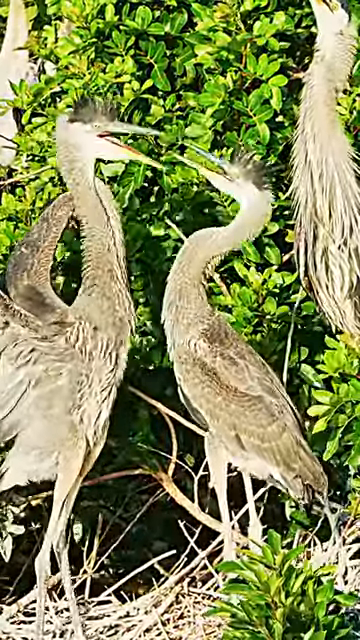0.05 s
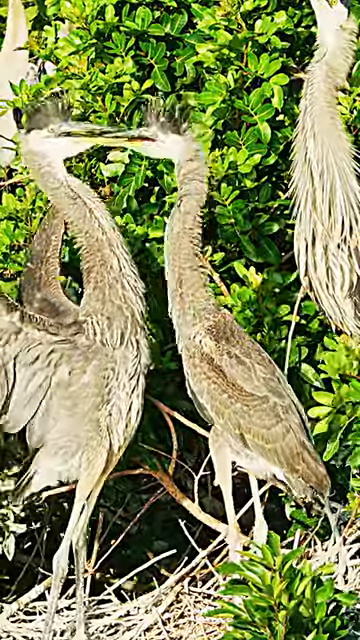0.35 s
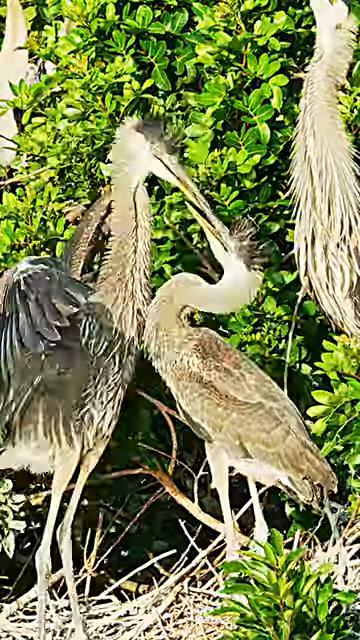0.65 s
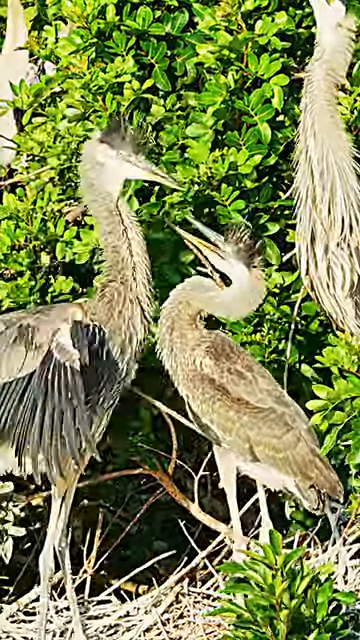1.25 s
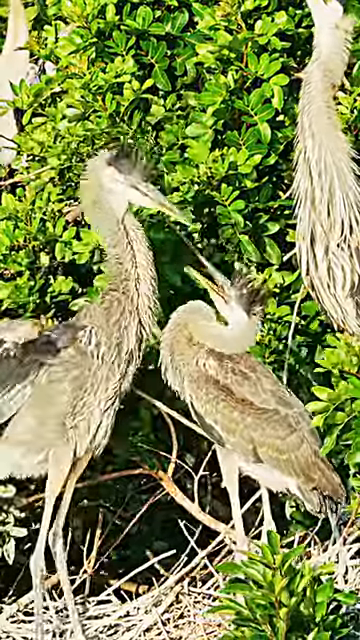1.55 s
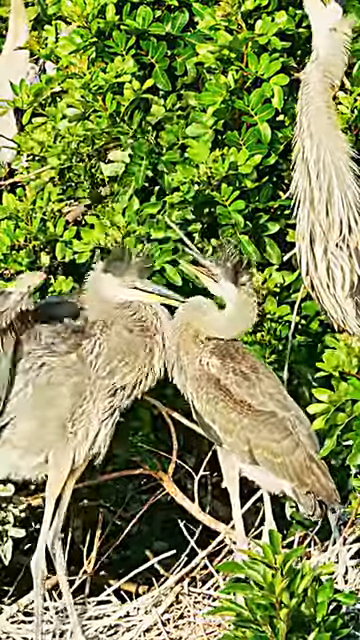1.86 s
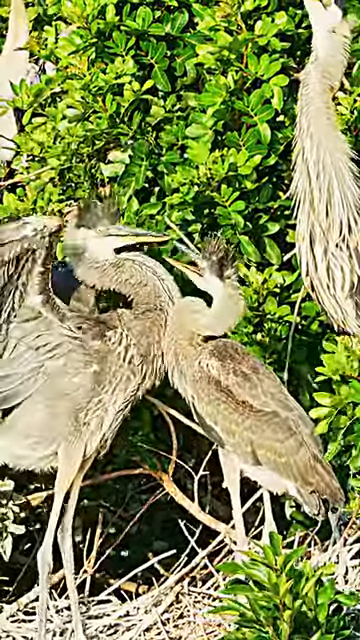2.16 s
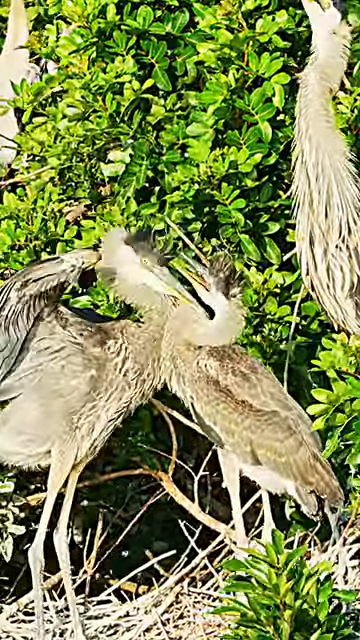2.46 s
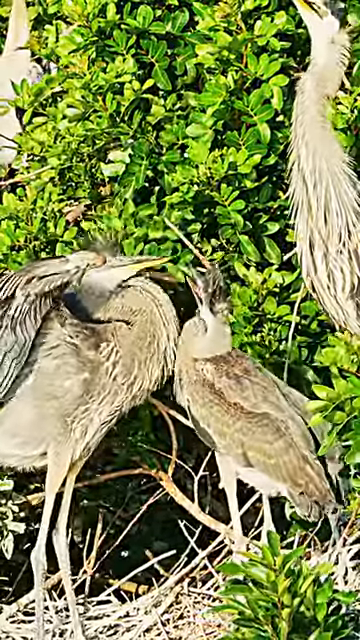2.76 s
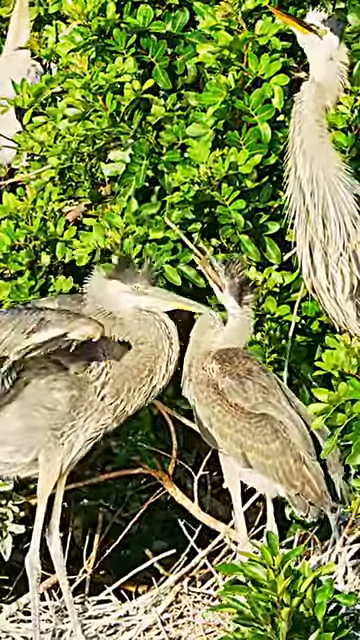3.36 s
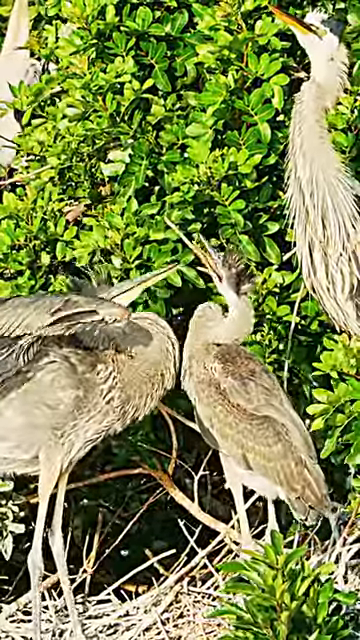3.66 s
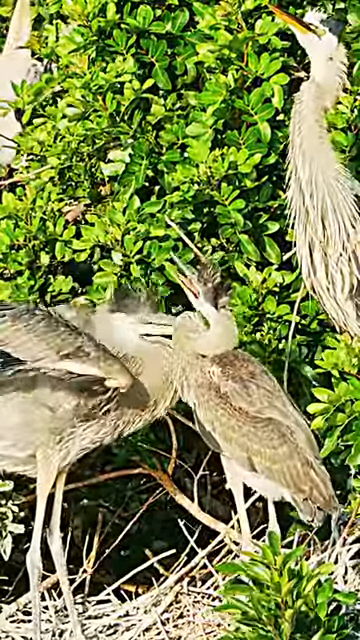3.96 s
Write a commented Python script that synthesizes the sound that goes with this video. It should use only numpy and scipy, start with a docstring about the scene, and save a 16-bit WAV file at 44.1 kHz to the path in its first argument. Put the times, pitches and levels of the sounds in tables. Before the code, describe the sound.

Hollow knocks and thin, sharp snaps come in clusters as two young herons clash bills outdoors. Faint nestling squeaks and rustling leaves fill the gaps, while distant traffic and light wind rumble underneath, easing near the end.

```python
"""Two young herons spar on a stick nest, over a steady bed of distant engines and light wind.
Wings and feet stir leaves and twigs. At 0.2 s the bills start to knock, snap shut and scrape along
each other, the bushes scattering every click; at 0.5 s a rising rattle runs into a hard knock.
More flurries follow near 2 s and 3 s, with faint nestling squeaks and hoarse rasps here and there.
After a loud knock and scrape at 3.2 s the deepest rumble sinks away under a few last taps."""
import sys
import numpy as np
from scipy import signal
from scipy.fft import rfft, irfft
from scipy.io import wavfile
from scipy.ndimage import uniform_filter1d

SR = 44100
rng = np.random.default_rng(int(sys.argv[2]) if len(sys.argv) > 2 else 0)


def put_to_file(sound):
    """Save the sound as 16-bit audio at rate SR, in the file named by the first command-line argument."""
    columns = np.atleast_2d(sound).T  # one column per channel
    safe = np.clip(columns, -1, 1)
    whole_steps = np.round(safe * 32767)
    wavfile.write(sys.argv[1], SR, whole_steps.astype(np.int16))


N = 176400  # 4 s


def undb(db):
    """Decibels to gain."""
    return 10 ** (np.asarray(db) / 20)


def unit(x):
    """Scale to rms 1."""
    return x / np.sqrt(np.mean(x ** 2))


def noise():
    """White noise."""
    return rng.standard_normal(N)


def colour(x, curve):
    """EQ a sound with a curve of (f/Hz, level/dB) points; rms 1."""
    hz, db = np.array(curve).T
    f = np.maximum(np.arange(len(x) // 2 + 1) * SR / len(x), 1)
    gain = undb(np.interp(np.log(f), np.log(hz), db))
    return unit(irfft(rfft(x) * gain, len(x)))


def fader(t, points):
    """Gain that rides through (t/s, level/dB) points."""
    return undb(np.interp(t, *np.array(points).T))


def resonate(x, hz, width_hz):
    """Band-pass through one resonance."""
    hz = min(hz, .45 * SR)
    q = hz / min(width_hz, SR / np.pi)
    return signal.lfilter(*signal.iirpeak(hz, q, fs=SR), x)


def walk(per_s):
    """Smooth random wandering; rms 1."""
    hold = int(SR / per_s)
    steps = np.repeat(rng.standard_normal(N // hold + 1), hold)
    return unit(uniform_filter1d(steps, hold)[:N])


def grains(per_s, spread_db):
    """Crackle of tiny impulses of uneven size; rms 1."""
    size = undb(spread_db * np.minimum(rng.exponential(size=N), 4))
    return unit((rng.random(N) < per_s / SR) * size * np.sign(noise()))


def add(out, s, sound):
    """Mix a sound in at s seconds."""
    i = int(np.clip(s * SR, 0, N - 1))
    out[i:i + len(sound)] += sound[:N - i]


KNOCK_CYCLES, SNAP_CYCLES = 0.65, 0.8  # cycles for a ring's decay to reach 1 / e


def click(hz, decay_cycles, crack_db):
    """A hard contact: two heavily damped modes, a sharp crack and a quick rebound."""
    t = np.arange(512) / SR
    hz = min(hz, SR / 3)
    cycles, upper_ratio = hz * t, 1.537
    attack = (1 - np.exp(-cycles / 1.05)) ** 2
    upper = undb(-9.5) * np.sin(2 * np.pi * cycles * upper_ratio) * (hz * upper_ratio < SR / 2)
    ring = attack * np.exp(-cycles / decay_cycles) * (np.sin(2 * np.pi * cycles) + upper)
    low_cut = signal.butter(2, hz / np.sqrt(2), "high", fs=SR)  # a small body radiates little bass
    ring = signal.lfilter(*low_cut, ring)
    crack = rng.standard_normal(len(t)) * np.exp(-t / 0.00017)
    for _ in range(2):
        crack = resonate(crack, hz=7220, width_hz=8300)
    hit = ring / np.abs(ring).max() + undb(crack_db) * crack / np.abs(crack).max()
    lag = int(0.00071 * (1 + rng.random()) * SR)
    rebound = undb(-7.5) * np.pad(hit, (lag, 0))[:len(t)]
    return hit + rebound


# EQ of the rumble bed, centre and sides: f/Hz, relative level/dB
RUMBLE_MID_EQ = [(15, -42), (26, -7), (36, 1), (52, -7.5), (90, -9.5), (150, -17), (250, -24), (400, -30),
                 (570, -28.5), (800, -37), (1300, -43), (3000, -56.5), (8000, -67), (16000, -74)]
RUMBLE_SIDE_EQ = [(15, -14), (35, 4.5), (60, -6.5), (120, -14.5), (200, -8), (330, -15), (600, -23),
                  (1200, -32), (2400, -43.5), (4500, -69.5)]
# Engine drone bands: f/Hz, width/Hz, level/dB before the sub ride
ENGINE_BANDS = [(36, 4.03, -21.5), (132.5, 10.2, -33), (200.5, 6.5, -40.5)]
# Fader ride on the sub-bass: t/s, level/dB
SUB_RIDE = [(0, -2), (.55, 4.5), (2.8, 3), (3.3, 0), (4, -10)]


def distant_rumble(t):
    """Far engines drone unevenly in a wide bed of traffic and wind; the sub-bass swells and sinks."""
    mid = undb(-19.5) * colour(noise(), RUMBLE_MID_EQ)
    side = undb(-23.5) * colour(noise(), RUMBLE_SIDE_EQ)
    for hz, width_hz, db in ENGINE_BANDS:
        band = resonate(noise(), hz, width_hz)
        mid += undb(db) * unit(resonate(band, hz, 2 * width_hz))
    sub = resonate(mid, hz=25, width_hz=27)
    mid += sub * (fader(t, SUB_RIDE) - 1)
    return np.array([mid + side, mid - side])


# Dark EQ of the echo from the bushes: f/Hz, relative level/dB
BUSH_EQ = [(500, 16.5), (2800, 2), (9000, -2), (16000, -10.5)]


def bush_echo(x, t, t60_s=0.065, predelay_s=0.003):
    """Branches and leaves scatter a short, dull echo; wet signal only."""
    scatter = colour(grains(per_s=5000, spread_db=-5.5), BUSH_EQ)
    tail = scatter * undb(-60 * t / t60_s) * (t > predelay_s)
    return signal.fftconvolve(x, tail / np.sqrt(np.sum(tail ** 2)))[:N]


# EQ of the leaf rustle: f/Hz, relative level/dB
LEAF_EQ = [(900, -1), (2000, 3.5), (3500, 3.5), (5500, -2.5), (10000, -9.5), (16000, -12)]
# Fader ride on the birds' movement in the nest: t/s, level/dB
STIR_RIDE = [(0, -6), (.2, 2), (.45, 6.5), (.73, -2), (.95, 1.5), (1.06, -6), (1.36, 7), (1.46, -7),
             (1.6, 1), (1.8, 1), (1.96, 5.5), (2.08, -1.5), (2.3, 5), (2.52, -4), (2.72, 1.5), (2.84, 2),
             (3.42, 4.5), (4, -0.5)]


def nest_rustle(t, twigs_per_s=35, twig_count=500):
    """Leaves and feathers rustle and small twigs tick as the birds move."""
    leaves = colour(grains(per_s=14000, spread_db=3.5), LEAF_EQ)
    leaves *= undb(-49.5 + 4.5 * walk(per_s=22.03))  # the level flickers
    twigs = np.zeros(N)
    for when, chance, size, pitch in rng.random((twig_count, 4)):
        hz = 7160 * 2 ** (0.8 * (2 * pitch - 1))  # within 0.8 octave either way
        tick = click(hz, SNAP_CYCLES, crack_db=-16)
        if chance < twigs_per_s * N / SR / twig_count:
            db = -31.5 + min(-np.log(size), np.e)
            add(twigs, when * N / SR, undb(db) * tick)
    return fader(t, STIR_RIDE) * (leaves + twigs)


def swell(t, peak_s, half_length_s):
    """Bell-shaped fade in and out."""
    return np.exp(-2 * ((t - peak_s) / half_length_s) ** 2)


# Faint nestling calls: peak t/s, half-length/s, level/dB, f/Hz, glide/(octaves per s)
SQUEAK_CUES = [(0.831, .012, -30, 3690, -20.5), (2.452, .022, -40, 2200, -4), (2.596, .014, -29, 4320, 1.5),
               (3.68, 0.021, -37.5, 2136, 14), (3.8, 0.013, -40, 2610, -1)]


def nestling_squeaks(t):
    """Short gliding whistles, made hoarse by an unsteady pitch."""
    out = np.zeros(N)
    waver = 1 + 0.06 * walk(per_s=700)
    for s, half_length, db, hz, glide in SQUEAK_CUES:
        octaves = glide * np.clip(t - s, -2 * half_length, 2 * half_length)
        pitch = hz * waver * 2 ** octaves
        out += undb(db) * swell(t, s, half_length) * np.sin(2 * np.pi * np.cumsum(pitch) / SR)
    return out


# Bright EQ of the grit: f/Hz, relative level/dB
GRIT_EQ = [(1000, -2), (2500, 7.5), (4500, 7), (8000, 5), (16000, -2.5)]
# Scrapes and rasps: peak t/s, half-length/s, level/dB before trim, body f/Hz, grit/dB re body
SCRAPE_AND_RASP_CUES = [(0.294, 0.043, -33, 2700, -20), (0.327, 0.016, -38, 3800, 11.5),
                        (0.348, 0.061, -32.5, 1660, -6.5), (0.47, 0.13, -38.5, 3860, -3),
                        (0.534, 0.025, -39, 1860, -7), (0.556, 0.014, -35, 2430, 7.5),
                        (0.575, 0.0049, -23.5, 4700, -3), (0.586, 0.1, -36.5, 3900, -22),
                        (0.783, 0.029, -32.5, 2170, -22), (0.838, 0.029, -27.5, 3520, -26),
                        (0.983, 0.015, -35, 2420, 8), (1.144, 0.053, -34, 2620, -25),
                        (1.221, 0.031, -33.5, 2570, -24), (1.332, 0.016, -29, 1680, -12),
                        (1.59, 0.13, -38, 4000, -28), (1.982, 0.043, -30, 2670, -12),
                        (1.996, 0.014, -31.5, 1200, -2), (2.125, 0.0062, -29, 2830, 1),
                        (2.595, 0.018, -39, 4180, -12), (2.599, 0.045, -32.5, 2420, -5),
                        (3.219, 0.037, -25, 2400, -2.5), (3.656, 0.042, -39.5, 3600, -30),
                        (3.773, 0.044, -33.5, 2730, -25)]


def scrapes_and_rasps(t, bursts_per_s=95, trim_db=-5):
    """Dry scrapes of bills and faint, hoarse nestling rasps: uneven bursts of ringing, gritty crackle."""
    burst_rate = bursts_per_s * (1 + 0.3 * walk(bursts_per_s))
    phase = np.cumsum(burst_rate) / SR % 1
    bursts = unit(np.exp(-phase / 0.42))
    crackle = bursts * grains(per_s=2700, spread_db=3)
    grit = colour(bursts * grains(per_s=3500, spread_db=1.5), GRIT_EQ)
    out = np.zeros(N)
    for s, half_length, db, hz, grit_db in SCRAPE_AND_RASP_CUES:
        body = unit(resonate(crackle, hz, width_hz=0.22 * hz))
        out += undb(db + trim_db) * swell(t, s, half_length) * (body + undb(grit_db) * grit)
    return out


def bill_rattle(start_s=0.4985, gap_s=0.0103, first_hz=1600, rise=1.12):
    """The bill edges skip along each other, each of five contacts ringing a little higher."""
    out = np.zeros(N)
    for k in range(5):
        add(out, start_s + k * gap_s, undb(-21) * click(first_hz * rise ** k, KNOCK_CYCLES, crack_db=1))
    return out


# Thin snaps of bill tips and twigs: t/s, level/dB before trim, ring f/Hz
SNAP_CUES = [(.3550, -16, 7000), (0.4522, -22, 4700), (.4545, -21, 12600), (.5841, -11.5, 9000),
             (.6150, -11.5, 7100), (.7775, -24, 13200), (.7888, -23, 13100), (.8041, -27, 13260),
             (0.8187, -21, 5100), (0.8437, -14.5, 5870), (0.8475, -13.5, 6900), (0.855, -19, 9400),
             (0.8786, -24, 8800), (0.931, -13, 6300), (1.1608, -24, 5900), (1.3163, -25, 7600),
             (1.3263, -12.5, 7000), (1.389, -28, 13100), (1.7563, -18, 5460), (1.8387, -23.5, 9400),
             (2.1863, -16.5, 8300), (2.3061, -21, 8600), (2.3643, -21.5, 6760), (3.0082, -20.5, 4540),
             (3.0145, -20, 7700), (3.1448, -22.5, 7700), (3.345, -22, 4640), (3.497, -18, 10300),
             (3.8272, -18.5, 9200), (3.9354, -19.5, 12100)]
# Hollow bill knocks: t/s, level/dB before trim, ring f/Hz, crack/dB re ring
KNOCK_CUES = [(0.2294, -12.5, 2940, -11), (0.2794, -12.5, 2930, -20), (0.2856, -7, 2430, -9),
              (0.2985, -16, 3050, 4.5), (0.4087, -20.5, 3600, -22), (0.484, -18.5, 1250, 5),
              (0.557, -12.5, 2360, -18), (0.582, -3.5, 4770, -10), (0.666, -12, 3960, 6),
              (0.8404, -15, 2960, -19), (0.8674, -18.5, 3700, -19), (1.0260, -20, 3060, 0),
              (1.138, -22, 2550, -20), (1.2317, -22, 2750, -19), (1.3311, -9.5, 4450, -9),
              (1.607, -17, 3000, -30), (1.634, -19.5, 3880, -15), (1.8630, -21.5, 4400, -6),
              (1.8927, -9, 3230, -2.5), (1.903, -24, 3030, -4), (1.956, -10, 4300, -10),
              (1.9812, -17.5, 3930, -10), (1.9906, -17, 2500, 6), (1.9954, -23, 1120, -2),
              (2.122, -18, 3840, 4), (2.1773, -28, 1850, 9.5), (2.3712, -22.5, 3470, -8),
              (2.6459, -16, 1890, 0.5), (2.7180, -22.5, 2770, -3), (2.789, -16.5, 1560, -11),
              (2.7956, -22, 2630, -7), (2.9149, -13.5, 3240, -5), (2.9555, -25.5, 3080, 4),
              (3.033, -15, 2760, -26), (3.047, -21.5, 3780, -4), (3.0848, -17, 2930, -1),
              (3.093, -23, 2680, 1), (3.182, -21.5, 3900, 0), (3.2082, -4.5, 2420, -21),
              (3.8320, -21, 4180, -8), (3.936, -19.5, 3440, -13)]


def bill_hits(knock_trim_db=-0.5, snap_trim_db=0.5):
    """The bills strike each other with hollow knocks and shut with thin, bright snaps."""
    out = np.zeros(N)
    for s, db, hz, crack_db in KNOCK_CUES:
        add(out, s, undb(db + knock_trim_db) * click(hz, KNOCK_CYCLES, crack_db))
    for s, db, hz in SNAP_CUES:
        add(out, s, undb(db + snap_trim_db) * click(hz, SNAP_CYCLES, crack_db=-7))
    return out


def scene():
    """The nest sits dead centre with a trace of width from the bushes; the rumble lies all around."""
    t = np.arange(N) / SR
    bed = distant_rumble(t)
    birds = bill_hits() + bill_rattle() + scrapes_and_rasps(t) + nestling_squeaks(t) + nest_rustle(t)
    side = undb(-26) * bush_echo(birds, t)
    mid = birds + undb(-13.5) * bush_echo(birds, t)
    return bed + np.array([mid + side, mid - side])


def record(dry):
    """A steep high cut at 16 kHz on the whole mix."""
    return signal.sosfilt(signal.ellip(8, .2, 80, 16000, fs=SR, output="sos"), dry)


dry = scene()
out = record(dry)
put_to_file(out)
```